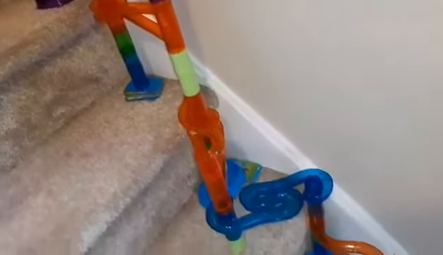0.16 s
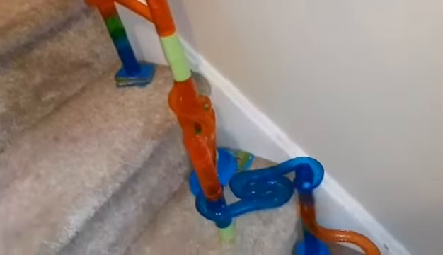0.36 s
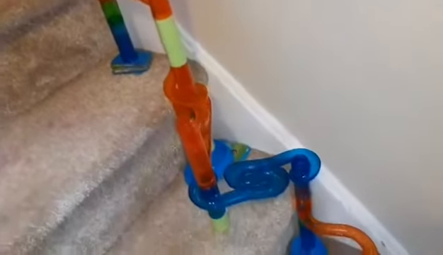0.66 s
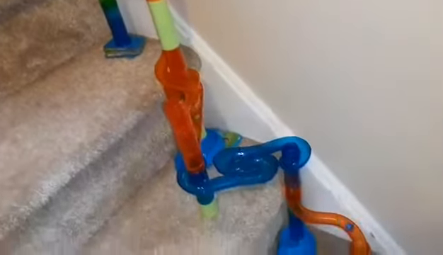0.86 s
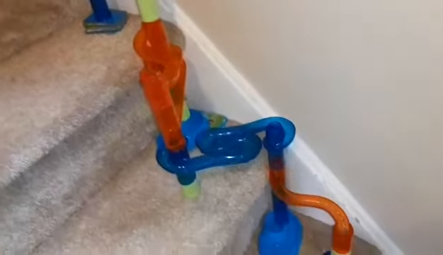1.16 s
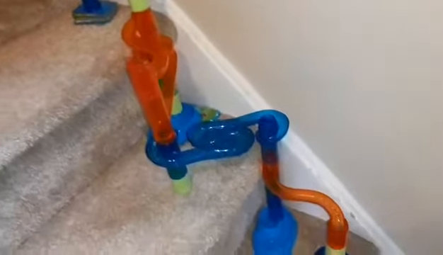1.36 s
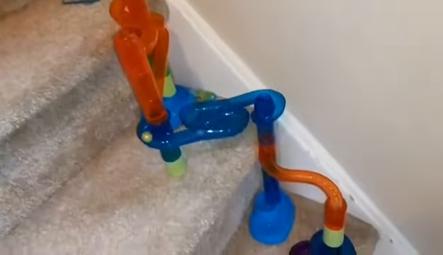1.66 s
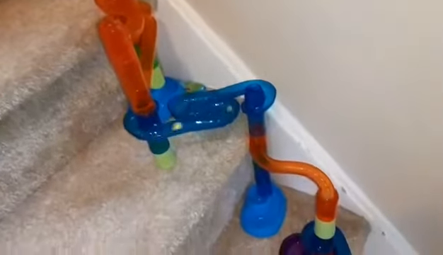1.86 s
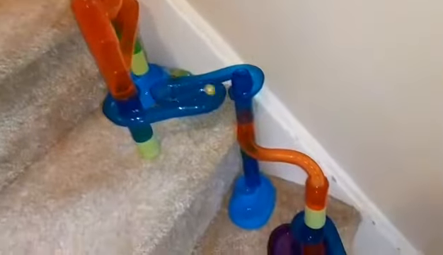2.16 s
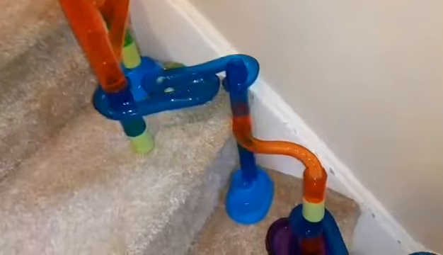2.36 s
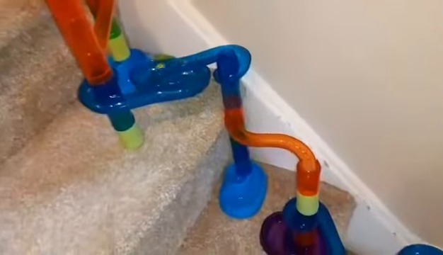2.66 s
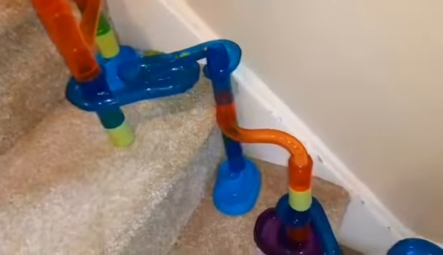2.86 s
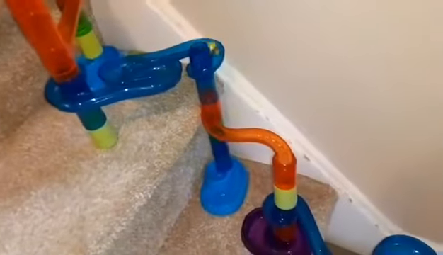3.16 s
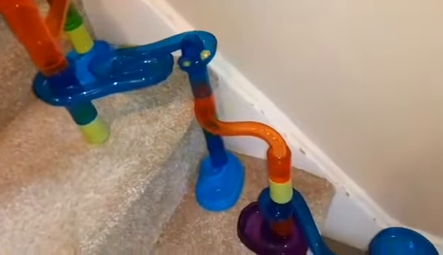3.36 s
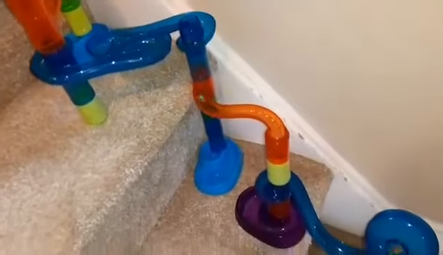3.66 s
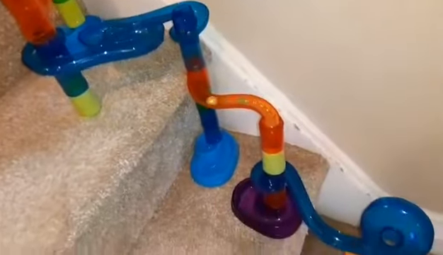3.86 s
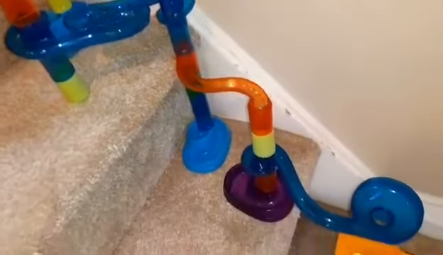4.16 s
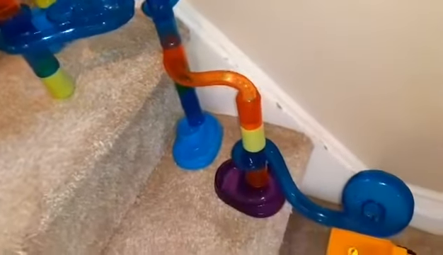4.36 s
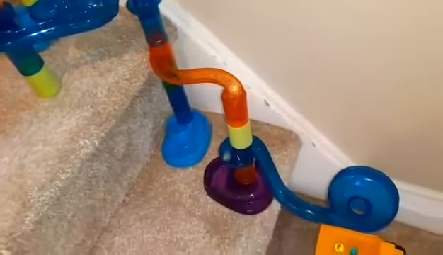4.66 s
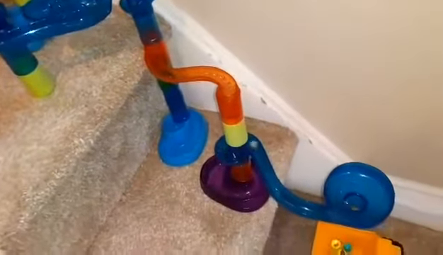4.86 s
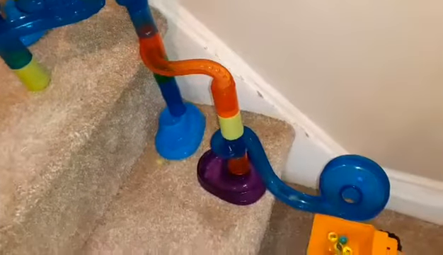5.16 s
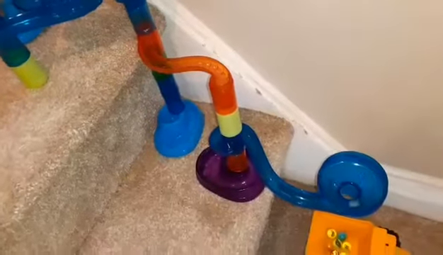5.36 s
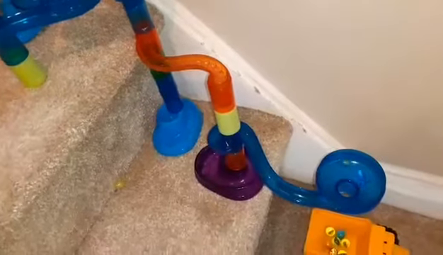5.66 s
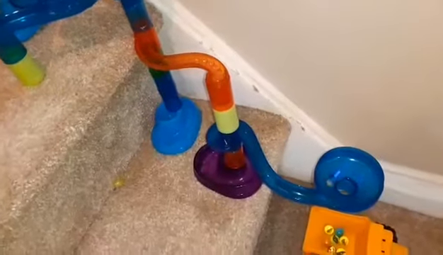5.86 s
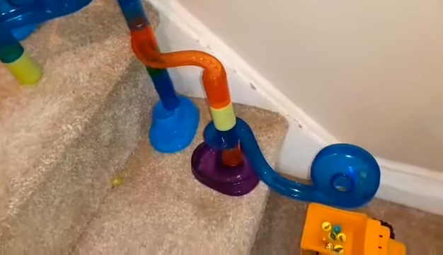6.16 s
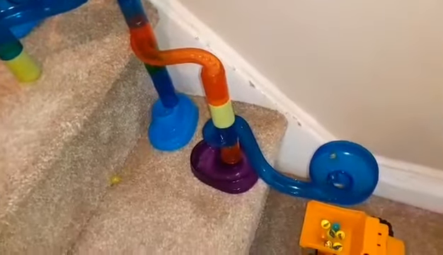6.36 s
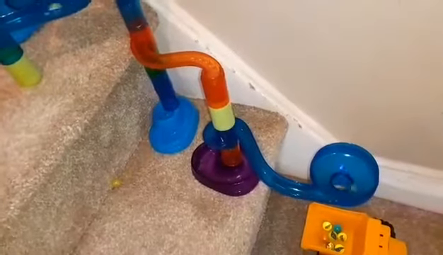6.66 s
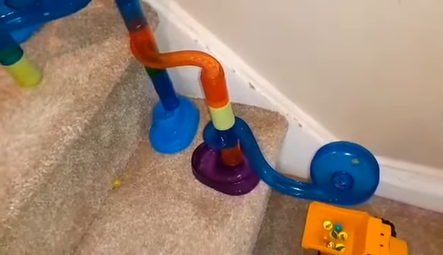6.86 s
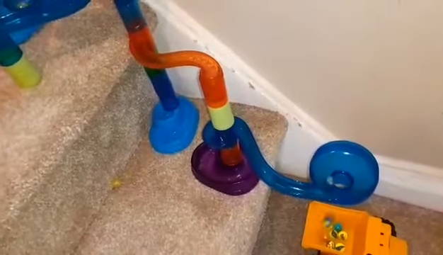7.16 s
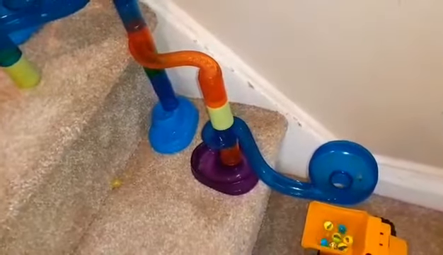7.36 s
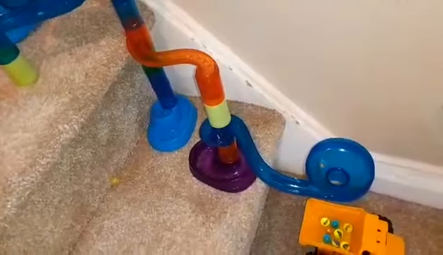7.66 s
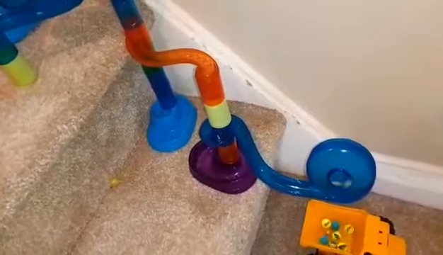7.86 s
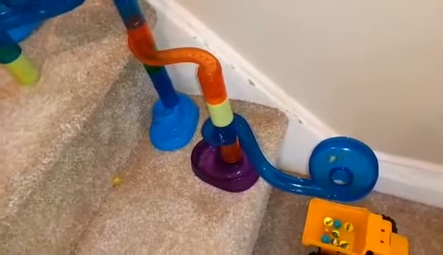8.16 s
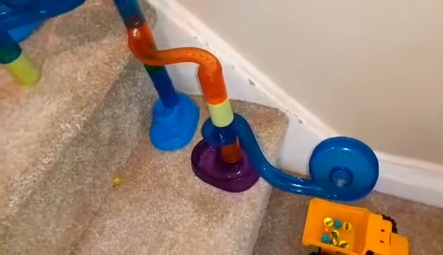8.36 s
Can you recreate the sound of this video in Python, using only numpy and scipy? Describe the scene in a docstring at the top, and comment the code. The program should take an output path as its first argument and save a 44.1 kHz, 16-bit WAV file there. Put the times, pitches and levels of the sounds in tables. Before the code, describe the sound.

A toy marble run heard close up in a small carpeted stairwell. Hard, bright knocks with a hollow plastic ring crowd together early, ease into soft rolling, then crowd together again with short dying rattles. Afterwards marbles circle quietly and only isolated clacks stand out, before a last quick burst. The phone adds faint low thuds and rumble.

```python
"""Carpeted stairs, where glass marbles run through the plastic tubes, ramps and funnels of a toy track.
Each knock is a burst of noise plus a short chatter, ringing plastic walls, hollow air and a treble part.
Rolling is a dense stream of tiny knocks over a fine rub; settling marbles rattle in dying bounces.
A near wall and the stairwell echo knocks and rattles; the hand-held phone adds low thuds and rumble."""
import sys
import numpy as np
from scipy import signal
from scipy.fft import rfft, irfft, next_fast_len
from scipy.io import wavfile
from scipy.ndimage import uniform_filter1d

SR = 44100
rng = np.random.default_rng(int(sys.argv[2]) if len(sys.argv) > 2 else 0)


def generate_wav(sig):
    """Save sig (samples, or channels by samples) to the path in sys.argv[1] as 16-bit PCM at SR."""
    pcm = np.round(np.clip(np.atleast_2d(sig).T, -1, 1) * 32767).astype(np.int16)
    wavfile.write(sys.argv[1], SR, pcm)


N = 374847
TIME = np.arange(N) / SR  # s

# Marbles knocking on plastic. Each row: time in seconds, peak in dB, pitch of the struck piece in Hz,
# hollow part in dB relative to the peak, treble part in dB relative to the peak.
KNOCKS = [(0.368, -24, 2450, -12, -39), (0.4511, -16.5, 3820, -15, -34), (0.5195, -18.5, 2780, -15, -6),
          (0.5316, -16, 2120, -9.5, 1.5), (0.5414, -12, 4620, -14.5, -6), (0.6435, -8.5, 3570, -11.5, -4.5),
          (0.7106, -18, 4300, -17, -5), (0.771, -11.5, 5470, -13, -20), (0.8651, -8.5, 4600, -17, -10),
          (0.8728, -11.5, 1810, -31, 0), (0.936, -13.5, 1420, -10, 1.5), (1.014, -6, 4820, -45, -43),
          (1.038, -6.5, 4530, -43, -7), (1.074, -12, 1900, -11.5, -22), (1.0943, -8.5, 4700, -49, -1),
          (1.1241, -5.5, 3290, -19, -10.5), (1.1353, -9, 4250, -14, -3), (1.1929, -5.5, 5050, -25, -19),
          (1.2479, -10, 5460, -16, -5), (1.3051, -10, 5700, -49, -32), (1.5454, -6, 5780, -34.5, -42),
          (1.603, -11.5, 2450, -14, 3), (1.658, -10, 4950, -25, -44), (1.7931, -21, 3660, -14, -34),
          (1.8267, -22, 3500, -16, -29), (1.957, -25.5, 3140, -27, -28), (1.975, -21, 4730, -17.5, -16),
          (2.1059, -24, 2910, -13.5, -8.5), (2.2293, -19, 3140, -20.5, -40), (2.391, -27, 3620, -21, -24),
          (2.71, -37, 4400, -12, -33), (3.0502, -29.5, 1510, -13, -26), (3.0906, -27, 4040, -12, -2),
          (3.3548, -22, 2640, -17, -34), (3.4, -15.5, 3540, -13.5, -38), (3.4534, -17, 4200, -20, -34.5),
          (3.48, -13, 2570, -14.5, -43), (3.5157, -11.5, 3040, -15, -5), (3.525, -7.5, 2880, -11.5, -25.5),
          (3.5379, -4.5, 3300, -15.5, -0.5), (3.5484, -11, 3360, -8.5, 1), (3.567, -7.5, 2970, -19.5, -24),
          (3.597, -6.5, 4470, -43, -14.5), (3.6791, -7, 4770, -16.5, -20), (3.705, -11, 4550, -23, -17),
          (3.7282, -12.5, 4600, -14.5, -3), (3.7767, -8, 3250, -14, -29), (3.8238, -6.5, 3160, -18.5, -7),
          (3.8497, -10, 1880, -23, 0), (3.87, -6, 1700, -39, -14), (3.937, -13.5, 1620, -25, -10),
          (4.0761, -8, 4510, -50, -29), (4.0916, -7, 3650, -20, -49), (4.1895, -7, 3730, -13.5, -2),
          (4.3181, -7, 3870, -22, -11.5), (4.342, -13.5, 3150, -13, -1.5), (4.376, -13, 3710, -19.5, -2),
          (4.4379, -16.5, 3530, -20, -3.5), (4.4867, -16.5, 3650, -39, -7.5),
          (4.523, -12.5, 3750, -47, -41), (4.548, -20.5, 3280, -13, -19), (4.567, -7.5, 4160, -48, -29),
          (4.598, -11.5, 2510, -20.5, -31), (4.6051, -9, 4300, -47, -37), (4.6438, -13.5, 2610, -49, -33),
          (4.819, -13, 3200, -44, -6), (4.8676, -16, 3200, -12, -5.5), (4.8865, -5, 3580, -18, -4),
          (5.2693, -29.5, 2480, -11, -47), (5.4337, -20.5, 4800, -22, -38), (5.5, -23.5, 4630, -13.5, -7.5),
          (5.522, -29, 3300, -10.5, -30), (5.5967, -33, 2360, -9, -29), (5.8795, -39, 2600, -31, 10.5),
          (6.0883, -5, 5240, -31.5, -10), (6.102, -15.5, 4860, -34, -24), (6.1477, -6.5, 4900, -19.5, -10),
          (6.2383, -15, 3650, -26, -7), (6.7793, -16.5, 3660, -12.5, -49),
          (6.8967, -19.5, 2440, -16.5, -33), (6.9507, -27.5, 4580, -15, -54.5),
          (7.063, -10.5, 4370, -35, -28), (7.0875, -16.5, 4640, -27, -45.5), (7.2084, -6, 1820, -21, -43.5),
          (7.224, -14, 1680, -14, 9.5), (7.242, -19, 1640, -25, 0), (7.2872, -13, 1800, -10.5, 1.5),
          (7.325, -22, 1460, -28, -6), (7.346, -25.5, 1840, -9, 5), (7.461, -28.5, 1695, -10, -3),
          (7.544, -40.5, 1700, 1, 11), (7.5968, -34.5, 2350, -10, -34), (7.632, -35, 1790, -5, -37),
          (7.912, -41, 1650, -8, 8.5), (8.1378, -20.5, 3740, -13.5, -41), (8.1987, -19, 2730, -12, -2),
          (8.2132, -9.5, 3320, -15.5, -3), (8.226, -14.5, 3700, -16, -15), (8.296, -24.5, 3380, -13, 4),
          (8.329, -5.5, 3240, -10.5, -1.5), (8.367, -7, 3210, -24, -34), (8.4281, -10, 3080, -15.5, -43)]
# Rolling levels, joined by straight lines. Each row: time in seconds, plastic walls in dB,
# hollow air of the tubes in dB.
ROLLING_LEVELS = [(0.0, -42.5, -54), (0.4, -55, -44), (0.62, -41, -50), (0.92, -33.5, -36.5),
                  (1.09, -53, -37.5), (1.21, -27, -54), (1.35, -41, -40.5), (2.67, -52, -53),
                  (3.38, -44.5, -46), (3.6, -33, -41.5), (3.74, -35, -47), (4.21, -44, -45.5),
                  (4.45, -42.5, -45.5), (4.97, -48, -47), (5.4, -49.5, -52.5), (5.5, -47, -53),
                  (7.29, -46.5, -48), (7.81, -61, -58.5), (8.14, -45.5, -51), (8.33, -42, -76),
                  (8.5, -70, -64)]
# Low thuds. Each row: start in seconds, peak before panning in dB, pitch in Hz,
# left minus right in dB, rise time in milliseconds.
THUDS = [(0.305, -47.5, 112, -39, 4.1), (1.5005, -12, 372, 23.5, 0.77), (1.906, -41.5, 126, -21, 3.4),
         (1.986, -47, 110, -12, 6), (2.036, -38.5, 111, -20, 3.2), (2.222, -40.5, 105, -17, 4),
         (2.255, -39, 140, -19, 2.2), (2.296, -42, 100, -20, 6.7), (2.401, -44, 110, -19, 3.9),
         (5.101, -29.5, 136, 0, 6.4), (6.708, -37, 98, -23, 4.8)]
# Handling rumble, joined by straight lines. Each row: time in seconds, level before panning in dB.
RUMBLE_LEVELS = [(0.0, -76), (0.23, -52), (0.45, -48.5), (2.34, -56), (2.6, -67), (2.91, -62),
                 (3.67, -63.5), (5.369, -68.5), (5.89, -81.5), (7.31, -67), (7.65, -85), (8.5, -65)]
# Air modes of the tubes. Each row: pitch in Hz, width in Hz, level in dB.
TUBE_AIR_MODES = [(67, 26, -7.5), (188.6, 140, -11.5), (342, 44, 3), (617, 120, 0), (782, 153, -2),
                  (1208, 283, -4)]
# Modes of the plastic walls. Each row: pitch in Hz, width in Hz, level in dB.
WALL_MODES = [(1368, 290, 15), (1873, 736, 16.5), (2177, 540, 18), (2697, 670, 11), (4506, 1190, 14.5),
              (4550, 2650, 9.5), (5485, 810, 12), (6290, 470, 7.5), (6900, 23000, -19)]
# The treble bands above the walls. Each row: pitch in Hz, width in Hz, level in dB.
TREBLE_MODES = [(8470, 5400, 14), (11300, 900, 16), (12380, 280, 11.5)]
# A marble settling among others. Each row: start in seconds, length in seconds, level in dB,
# pitch in Hz.
RATTLES = [(0.868, 0.091, -24.5, 1660), (1.029, 0.22, -31.5, 5130), (3.088, 0.15, -43.5, 3660),
           (3.541, 0.36, -27.5, 3340), (3.853, 0.13, -16.5, 1670), (4.093, 0.2, -27, 2780),
           (4.608, 0.14, -37.5, 3380), (6.241, 0.043, -24.5, 1740), (7.222, 0.16, -24.5, 1490)]
# Treble colour of the microphone port. Each row: frequency in Hz, gain in dB.
MIC_RESPONSE = [(20, -4), (7000, 0.5), (8500, -5), (10200, -13.5), (12300, 3), (13300, -17.5), (14300, -22),
                (15200, -71.5)]
# Where the marbles are on the track. Each row: start in seconds, looseness of the joints in dB,
# clearness of the ring in dB.
TRACK_PARTS = [(0.0, 3.5, -1.5), (1.7, 9, 2), (3.3, 3, 4.5), (4.3, -5, 3), (4.555, 0, 3.5), (5.0, 4.5, 4),
               (7.0, 2.5, 16), (7.19, 8.5, 5.5), (8.0, -5, -8)]

PORT_LAG = int(0.0003 * SR)  # samples by which the right port hears treble late


def undb(db):
    """Turn decibels into a gain."""
    return 10 ** (np.asarray(db) / 20)


def unit(x):
    """Bring a sound to an RMS of one."""
    return x / np.sqrt(np.mean(x ** 2))


def ring(x, modes, scatter_db=0.):
    """Pass x through damped modes; scatter gives each mode its own strength in each channel."""
    n = next_fast_len(x.shape[-1], True)
    f = np.arange(n // 2 + 1) * SR / n
    chance = rng.standard_normal((len(modes), 2, 1))
    gain = 0
    for k, (hz, width, db) in enumerate(modes):
        resonance = 1 / (1 + 1j * (f / hz - hz / (f + 1)) * hz / width)
        gain = gain + (-1) ** k * undb(db + scatter_db * chance[k]) * resonance
    return irfft(rfft(x, n) * gain, n)[:, :x.shape[-1]]


def walk(rate):
    """Draw random levels, rate of them a second, and slide from each to the next."""
    k = int(SR / rate)
    steps = np.repeat(rng.standard_normal(N // k + 1), k)
    return uniform_filter1d(steps, k)[:N]


def add(out, s, x, pan_db):
    """Mix a two-channel sound in at s seconds, with left minus right of pan_db."""
    i = int(s * SR)
    x = x[:, :N - i]
    out[:, i:i + x.shape[1]] += x * undb(np.array([[pan_db], [-pan_db]]) / 2)


def ticks(n, per_s, spread_db):
    """Scatter uneven tiny contacts, at the same moments in both channels."""
    size = undb(spread_db * np.minimum(rng.exponential(size=n), 3))
    struck = rng.random(n) < per_s / SR
    return unit(struck * size * rng.standard_normal((2, n)))


def rolling():
    """Seams and bumps under the marbles: dense small ticks over a fine rub; each wall mode flickers alone."""
    s, walls_db, hollow_db = np.transpose(ROLLING_LEVELS)
    waver = undb(2.2 * walk(45) + 1.8 * walk(16))
    rub = 1.7
    contact = (np.abs(ticks(N, per_s=600, spread_db=1.5)) + rub) * waver
    tilt_db = -3  # per octave above 1400 Hz
    walls = 0
    for hz, width, db in WALL_MODES:
        flicker = undb(4.5 * walk(18))
        mode = (hz, 0.86 * width, db + tilt_db * np.log2(hz / 1400))
        walls = walls + flicker * ring(contact * rng.standard_normal((2, N)), [mode])
    # a rolling contact is too soft for the top
    walls = signal.sosfilt(signal.butter(3, 7000, fs=SR, output="sos"), walls)
    push = contact * rng.standard_normal((2, N))
    walls = unit(walls) + undb(-25.0) * unit(ring(push, TREBLE_MODES))
    air = push.mean(axis=0) + 0.77 * push  # long waves reach both ports alike
    hollow = unit(ring(air, TUBE_AIR_MODES[1:]) * undb(3 * walk(12)))
    walls_gain = undb(np.interp(TIME, s, walls_db))
    hollow_gain = undb(np.interp(TIME, s, hollow_db))
    return walls * walls_gain + hollow * hollow_gain


def rumble():
    """The hand on the case: bumpy noise through two low modes, stronger at the right port."""
    s, db = np.transpose(RUMBLE_LEVELS)
    pan_db = -7  # left minus right
    grip = undb(7 * walk(22))
    modes = [(45.3, 140, -25.0), (111, 27, -12.0)]  # pitch Hz, width Hz, dB
    low = unit(ring(rng.standard_normal((2, N)) * grip, modes))
    return low * undb(np.interp(TIME, s, db) + np.array([[pan_db], [-pan_db]]) / 2)


def swell(t, ms):
    """Rise to one in ms milliseconds, then die away."""
    return 1000 * t / ms * np.exp(1 - 1000 * t / ms)


def thuds():
    """Bumps on carpet and phone case: two dull modes swell and die; a quick bump also snaps."""
    out, t = np.zeros((2, N)), np.arange(8192) / SR
    upper_db, snap_db, snap_ms = -3, 8, 0.15
    for s, peak_db, hz, pan_db, rise_ms in THUDS:
        modes = np.sin(2 * np.pi * hz * t) + undb(upper_db) * np.sin(2 * np.pi * 2.27 * hz * t)
        snap = swell(t, snap_ms) * np.cos(400 * t / snap_ms)
        body = swell(t, rise_ms) * modes + undb(snap_db) / rise_ms ** 2 * snap
        # little far below the mode
        body = signal.sosfilt(signal.butter(2, hz / 2, "high", fs=SR, output="sos"), body)
        body = body / np.abs(body).max() * undb(peak_db)
        add(out, s, np.tile(body, (2, 1)), pan_db)
    return out


def piece(hz, fall_db, clear_db=0.):
    """Favour wall modes near the piece's pitch by fall_db an octave, and add a few thin modes of its own."""
    walls = [(f, w, db - fall_db * abs(np.log2(f / hz))) for f, w, db in WALL_MODES]
    pitch = [(hz, hz / 7, 9.5 + clear_db)]
    spread_oct = 0.586
    own = np.clip(hz * 2 ** (spread_oct * rng.standard_normal(4)), 900, 9000)
    return walls + pitch + [(f, f / 20, 4) for f in own]


def knocks():
    """A short bright crack; a moment later the loose joints shake a wider part of the track."""
    out, t = np.zeros((2, N)), np.arange(6144) / SR
    crack_s, wait_s, shake_s, lead_s = 0.002, 0.007, 0.028, 0.0018
    fall_db, shake_fall_db = 11, 6  # per octave away from the struck pitch
    shake_db, shake_db_per_db = -9, 0.41  # a harder knock has a larger share of after-shake
    scatter_db, pan_db, pan_scatter_db = 2.5, -1.5, 2.5
    alike = 0.16  # share of the push's power common to both channels
    crack = (t / crack_s * np.exp(1 - t / crack_s)) ** 2
    shake = np.exp(-t / shake_s) / (1 + (wait_s / (t + 1 / SR)) ** 4)  # sets in after the wait
    for s, peak_db, hz, hollow_db, treble_db in KNOCKS:
        chatter = uniform_filter1d(np.abs(ticks(len(t), 450, spread_db=2)[0]), 90)
        joints = np.minimum(unit(chatter), 1.6) + 0.45
        loose_db, clear_db = [row[1:] for row in TRACK_PARTS if row[0] <= s][-1]
        after = undb(loose_db + shake_db + shake_db_per_db * peak_db) * shake * joints
        both, left, right = rng.standard_normal((3, len(t)))
        push = np.sqrt(alike) * both + np.sqrt(1 - alike) * np.array([left, right])
        side_db = pan_db + pan_scatter_db * rng.standard_normal()
        struck, whole = piece(hz, fall_db, clear_db), piece(hz, shake_fall_db)
        layers = [(push, struck, whole, 0),
                  (both, TUBE_AIR_MODES, TUBE_AIR_MODES, hollow_db),  # long waves reach both ports alike
                  (push, TREBLE_MODES, TREBLE_MODES, treble_db)]
        for noise, near, wide, db in layers:
            part = ring(noise * crack, near, scatter_db) + ring(noise * after, wide, scatter_db)
            top = np.abs(part[0] + np.roll(part[1], PORT_LAG)).max() / 2
            add(out, s - lead_s, part / top * undb(peak_db + db), side_db)
    return out


def stairwell(x):
    """One echo from the near wall, then a diffuse tail whose treble dies first and whose bass is shared."""
    wall_echo_s, wall_echo_db = 0.0065, -14
    room_t60_s, treble_t60_s, room_db = 0.25, 0.03, -12
    t = np.arange(int(0.4 * SR)) / SR
    noise = rng.standard_normal((2, len(t)))
    bass = signal.lfilter([0.1], [1, -0.9], noise)
    noise = noise - bass + 0.88 * bass.sum(axis=0) + 0.09 * bass
    dull = signal.lfilter([0.25], [1, -0.75], noise)
    tail = dull * undb(-60 * t / room_t60_s) + (noise - dull) * undb(-60 * t / treble_t60_s)
    tail = tail * np.clip(t / 0.0049, 0, 1) ** 2  # the tail builds up in 4.9 ms
    tail = tail / np.sqrt(np.sum(tail ** 2, axis=1, keepdims=True)) * undb(room_db)
    tail[:, int(wall_echo_s * SR)] += undb(wall_echo_db)
    return signal.fftconvolve(x, tail, axes=1)[:, :N]


def rattles():
    """Quick bounces too dense to count, dying out; the bright part dies first, the piece's pitch stays."""
    out, t = np.zeros((2, N)), np.arange(16384) / SR
    treble_db, hollow_db, bright_db = -18, -12, -3
    fade_s, bright_fall, pan_db = 0.07, 0.68, -1.5
    for s, length_s, db, hz in RATTLES:
        fade = 1 / (1 + np.exp((t - length_s) / fade_s * 4))
        force = np.exp(-1.2 * t / length_s) * fade * np.clip(t / 0.004, 0, 1)
        push = ticks(len(t), 700, spread_db=3) + 0.5 * rng.standard_normal((2, len(t)))
        own = [(hz, hz / 2.3, 0)]
        bright = unit(ring(push, piece(5.2 * hz, 0.))) + undb(treble_db) * unit(ring(push, TREBLE_MODES))
        bright = undb(bright_db) * bright * np.exp(-bright_fall * t / 0.54)
        # the pitch is rung twice for a steeper peak
        body = unit(ring(ring(push, own), own))
        body = body + undb(hollow_db) * unit(ring(push[0], TUBE_AIR_MODES))
        add(out, s, (body + bright) * force * undb(db), pan_db)
    return out


def scene():
    """Place knocks and rattles in the stairwell, then add rolling, thuds and rumble."""
    hits = knocks() + rattles()
    wet = stairwell(hits)
    # the direct treble reaches the right port later; its bass stays in time
    late = np.roll(hits[1], PORT_LAG)
    low = signal.lfilter([0.12], [1, -0.88], hits[1] - late)
    hits[1] = late + low
    # small parts radiate little deep bass
    thin = signal.sosfilt(signal.butter(1, 130, "high", fs=SR, output="sos"), hits + wet)
    return thin + rolling() + thuds() + rumble()


def record(dry):
    """Loud peaks round off; the microphone port has a notch and a peak in the treble; the top is cut."""
    hz, db = np.transpose(MIC_RESPONSE)
    grid = np.linspace(0, SR / 2, 257)
    gain = undb(np.interp(np.log(grid + 1), np.log(hz), db))
    port = signal.firwin2(129, grid, gain, fs=SR)
    rounded = np.tanh(0.9 * dry) / 0.9
    soft = signal.fftconvolve(rounded, port[None], mode="same", axes=1)
    top_hz = 15500
    return signal.sosfilt(signal.ellip(10, 0.2, 90, top_hz, fs=SR, output="sos"), soft)


dry = scene()
out = record(dry)
generate_wav(out)
```